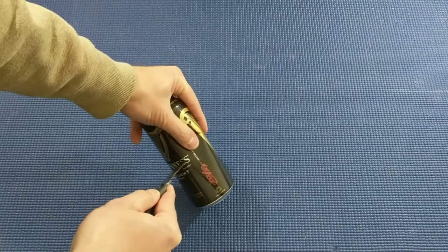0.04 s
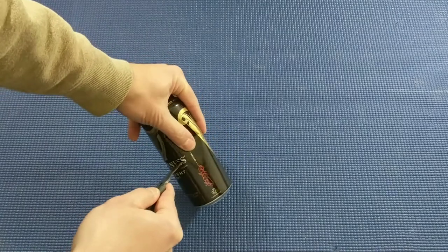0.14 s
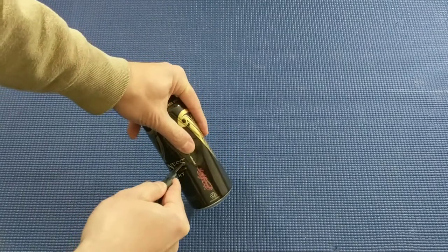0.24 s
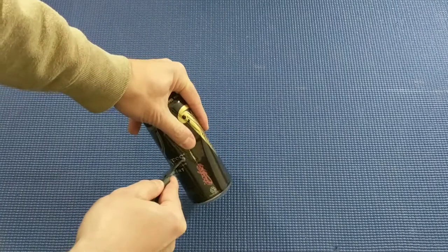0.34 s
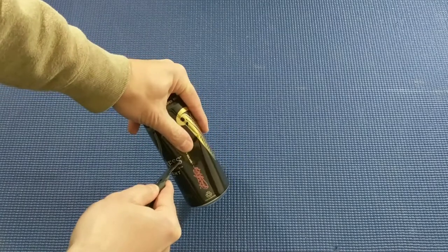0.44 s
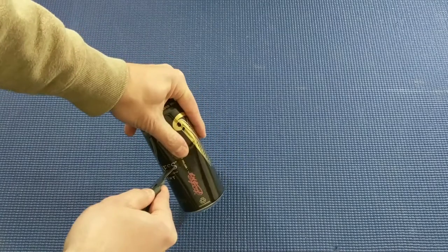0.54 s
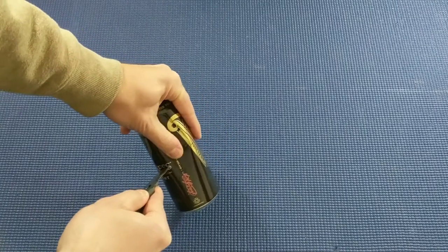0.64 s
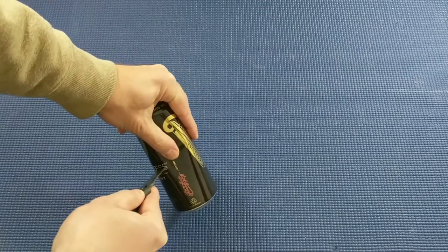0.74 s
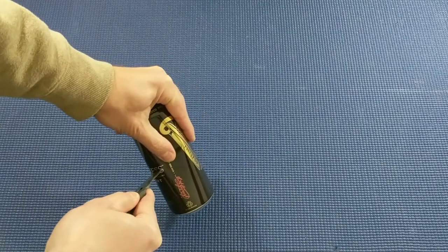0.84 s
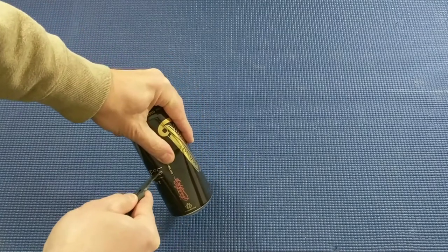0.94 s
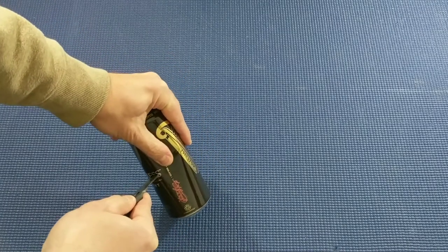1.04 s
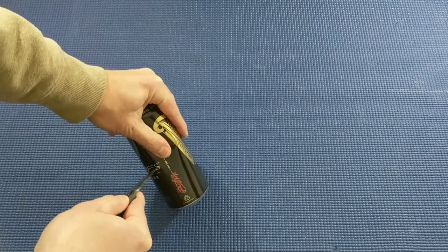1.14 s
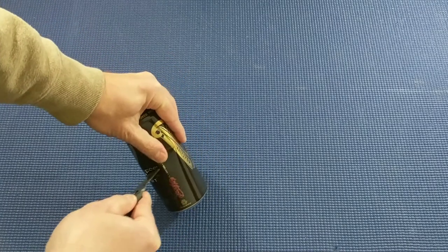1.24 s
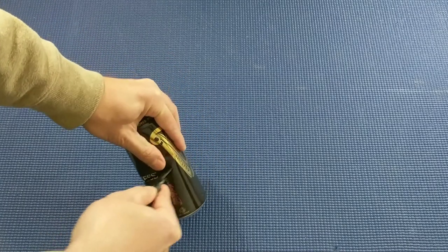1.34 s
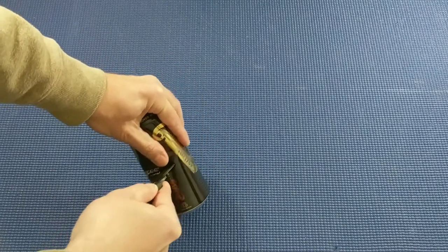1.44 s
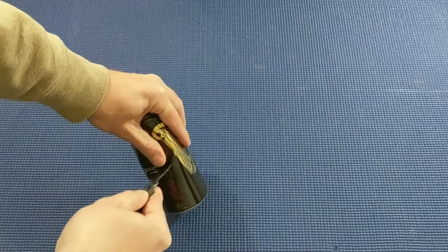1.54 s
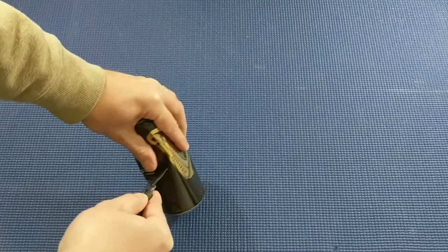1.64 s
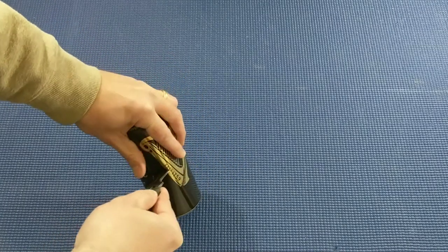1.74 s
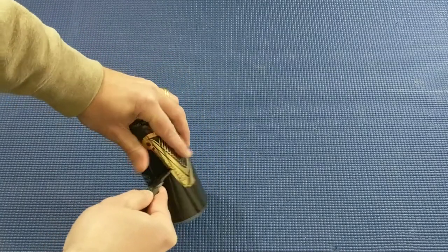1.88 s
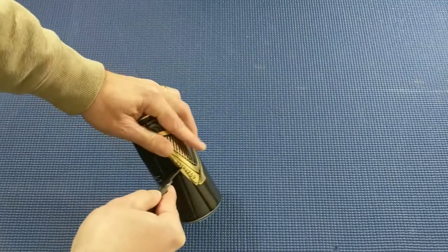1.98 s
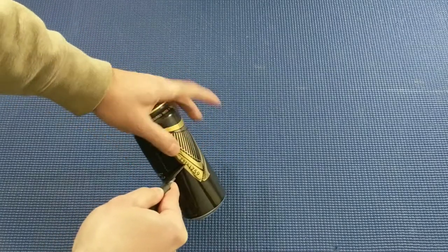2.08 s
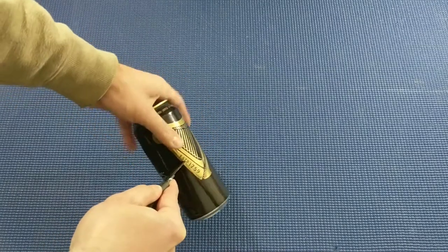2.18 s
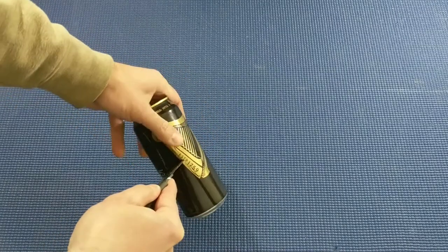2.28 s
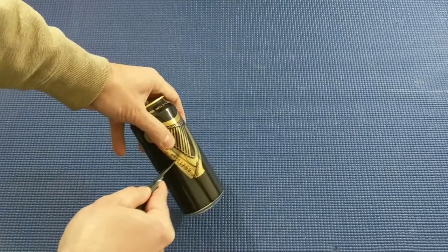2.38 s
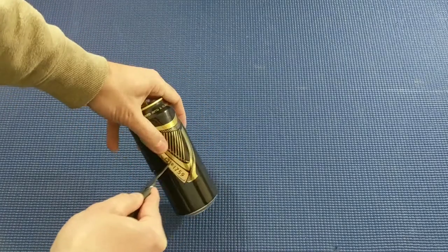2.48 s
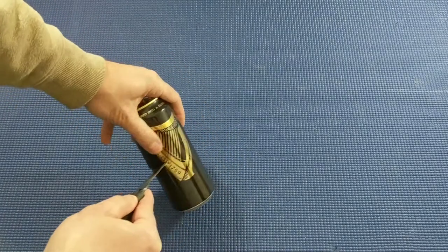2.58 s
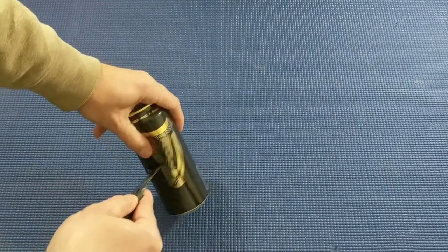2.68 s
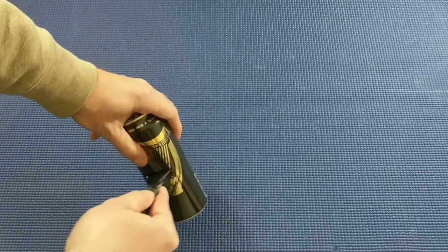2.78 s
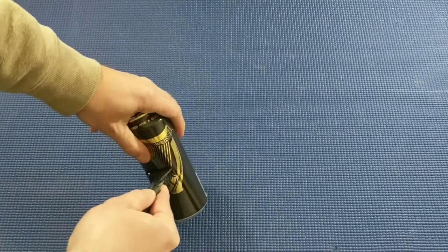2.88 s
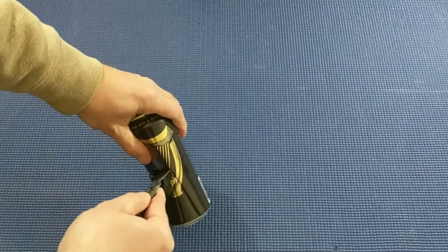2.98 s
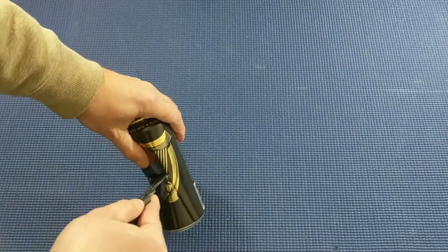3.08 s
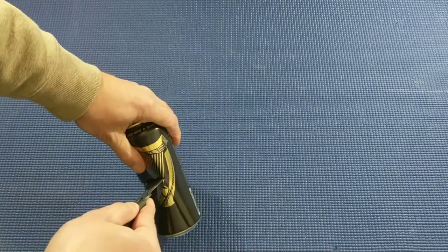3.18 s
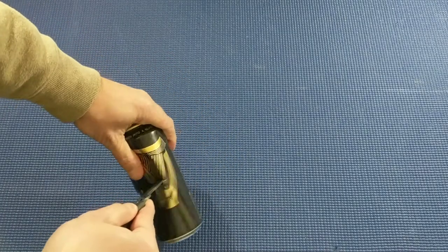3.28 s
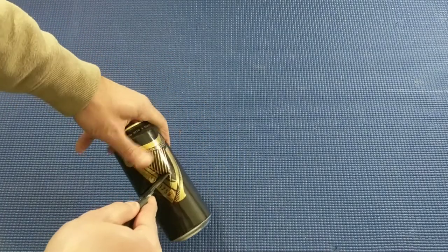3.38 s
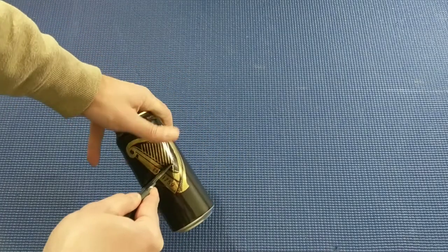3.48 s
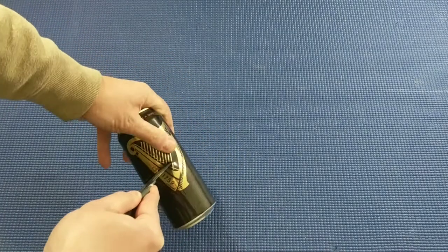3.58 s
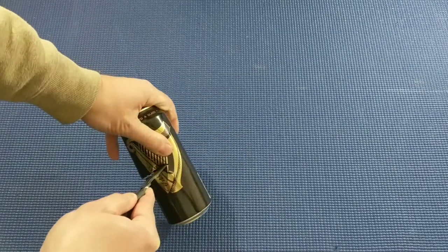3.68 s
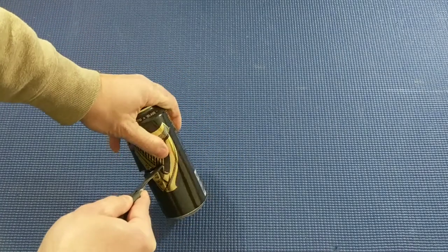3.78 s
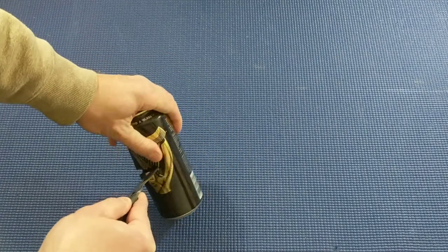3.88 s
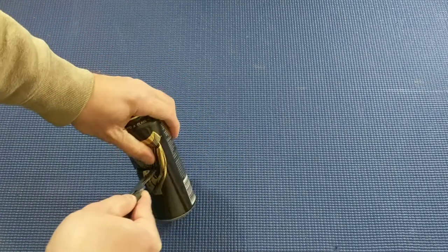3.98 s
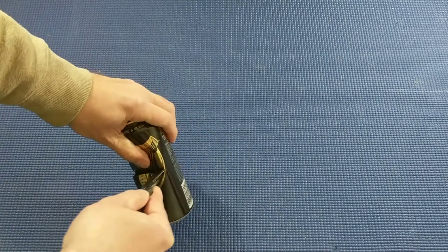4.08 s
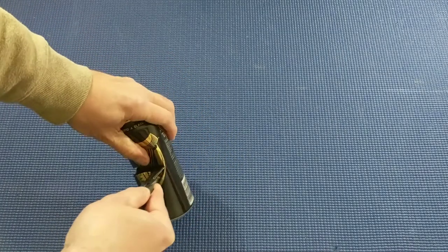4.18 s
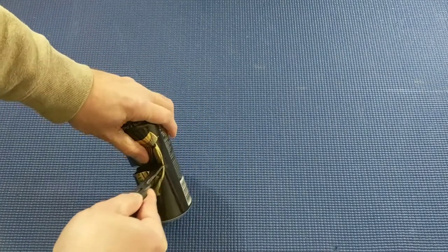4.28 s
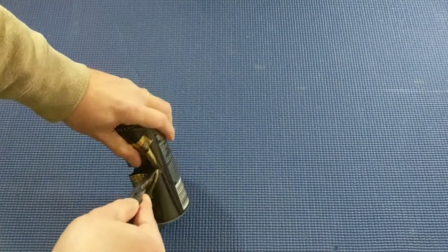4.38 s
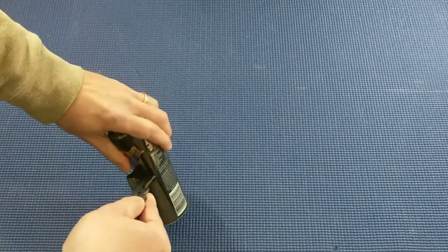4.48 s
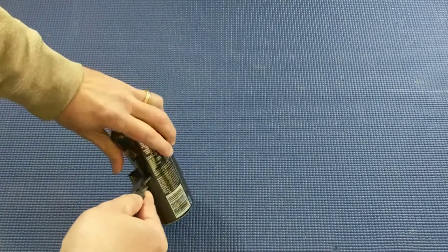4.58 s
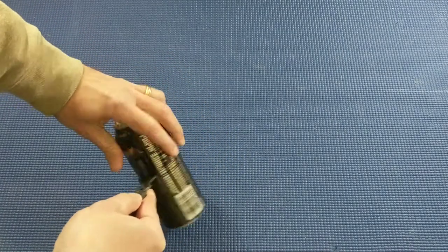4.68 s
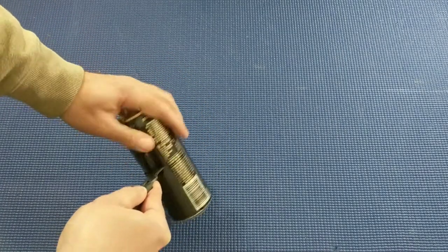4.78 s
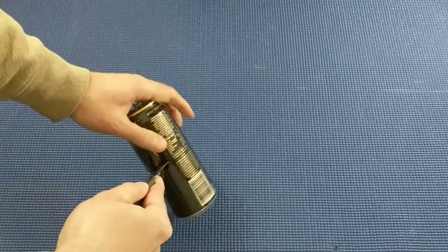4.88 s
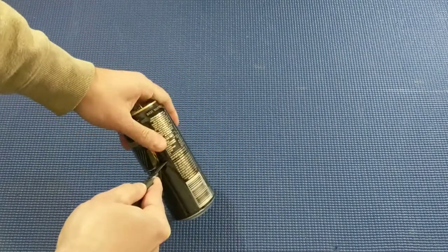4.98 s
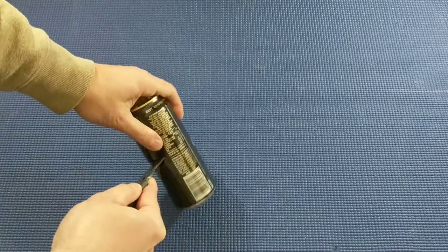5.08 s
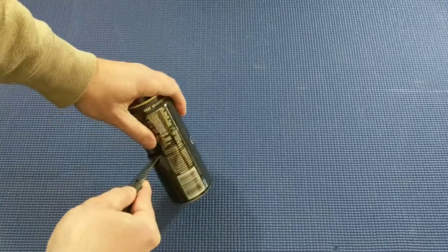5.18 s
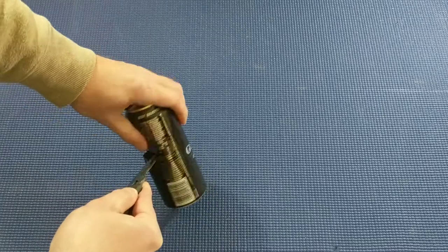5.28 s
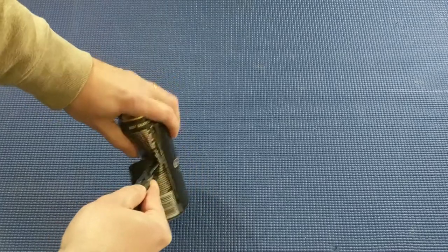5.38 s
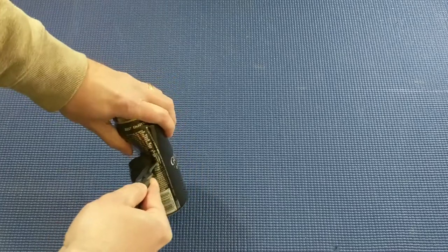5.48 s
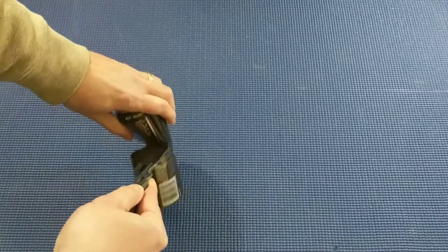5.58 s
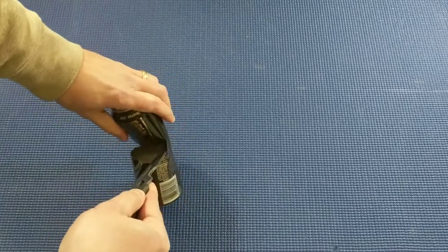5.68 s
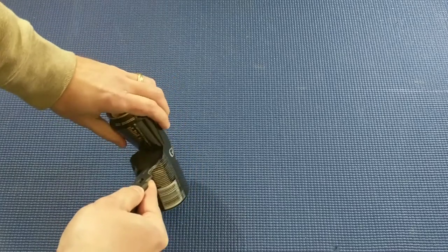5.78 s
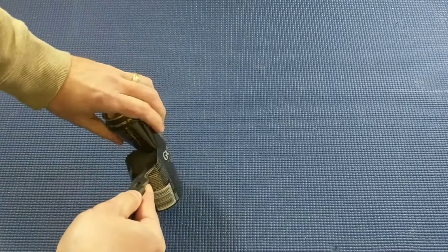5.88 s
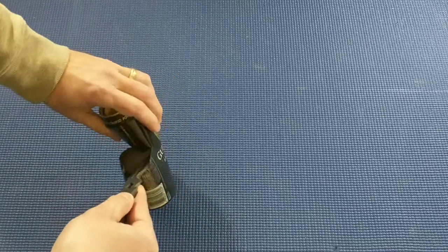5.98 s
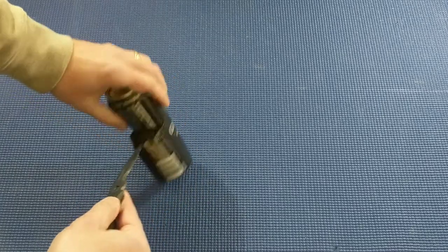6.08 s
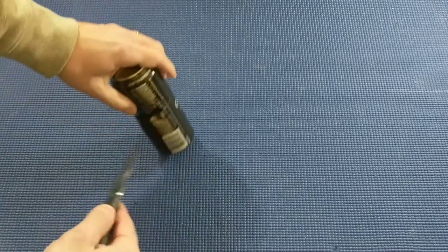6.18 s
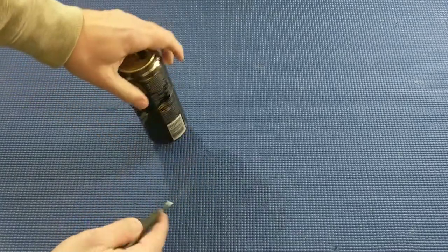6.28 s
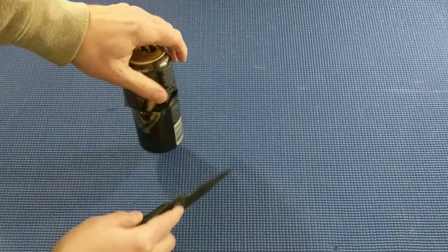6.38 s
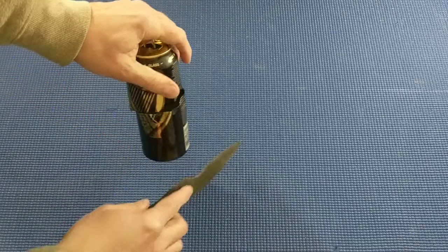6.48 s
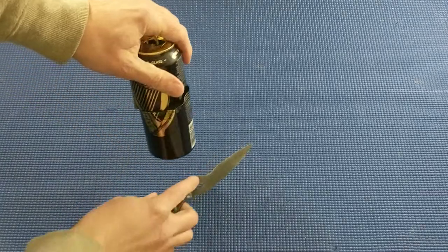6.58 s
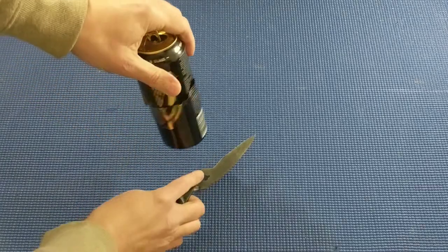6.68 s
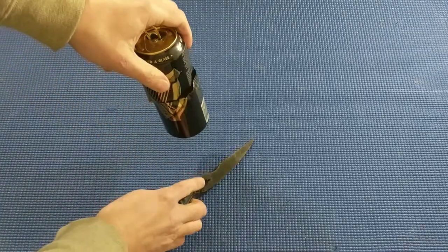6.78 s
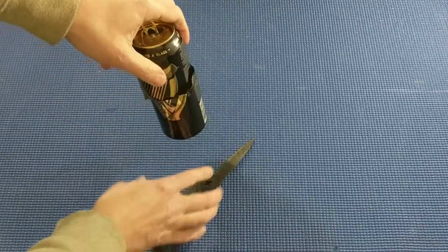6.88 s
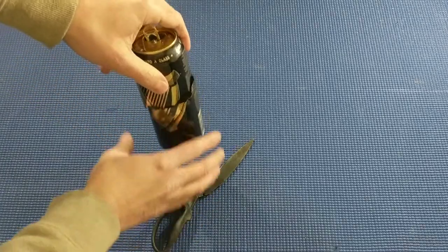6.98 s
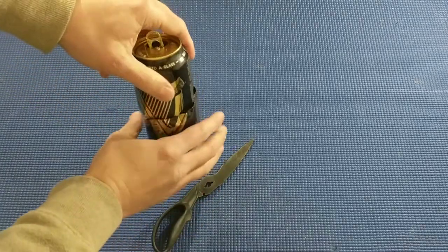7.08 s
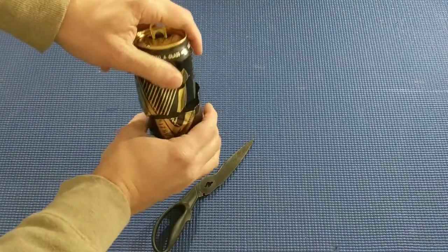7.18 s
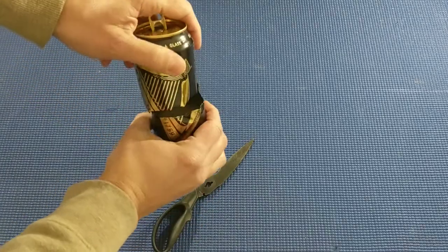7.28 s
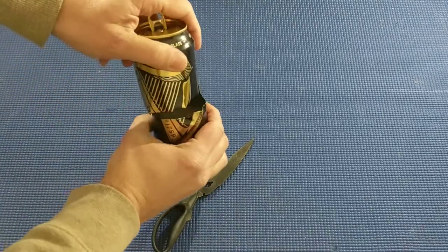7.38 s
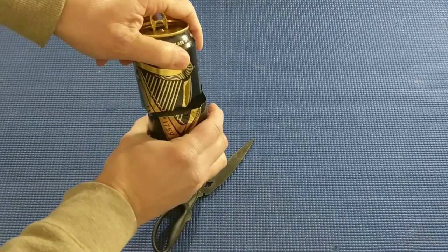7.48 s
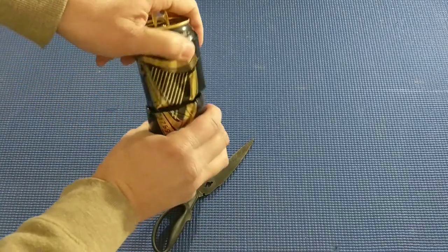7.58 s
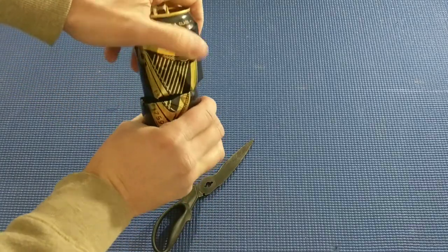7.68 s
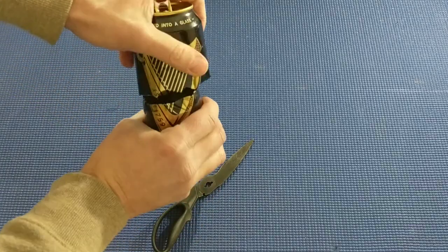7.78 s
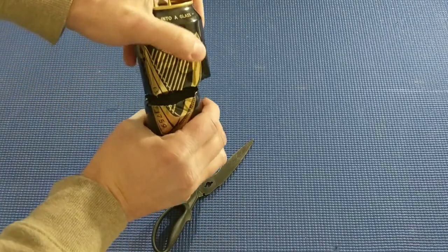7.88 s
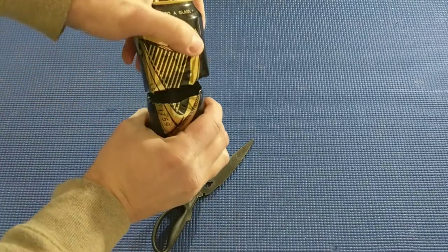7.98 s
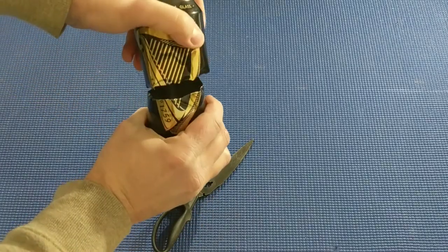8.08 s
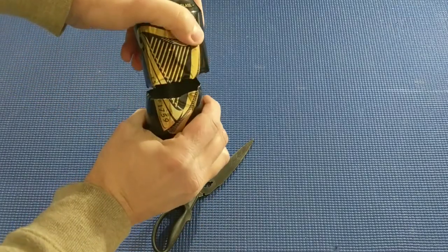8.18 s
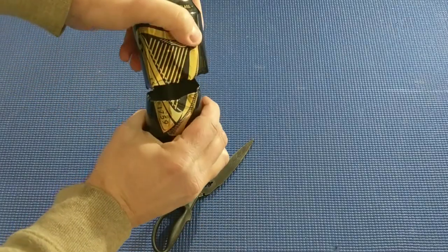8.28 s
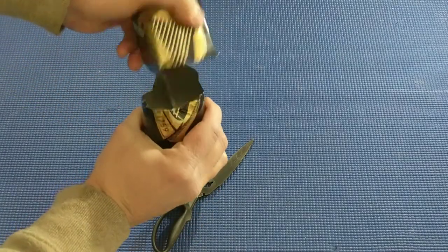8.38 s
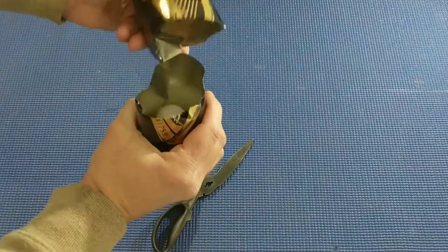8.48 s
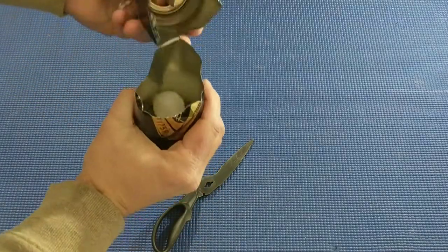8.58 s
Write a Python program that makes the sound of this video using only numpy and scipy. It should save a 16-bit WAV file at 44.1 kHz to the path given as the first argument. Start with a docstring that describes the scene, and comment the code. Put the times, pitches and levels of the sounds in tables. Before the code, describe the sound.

In a quiet room, scissors cut around a thin empty drink can on a foam mat. Short gritty rips alternate with sharp tinny pops of buckling wall, hollow at first, brighter and denser toward five or six seconds. Then a near-quiet pause with soft handling knocks, followed by isolated metallic clicks and a final hard snap and rip as the halves separate. Close microphone, very little room echo.

```python
"""A low shake of the stand in a quiet room, and at once scissors tear stepwise through a thin can on a foam mat.
Strokes are trains of fast slips, pops single blows; both ring a model of the can's wall, shell and air.
The air booms mostly higher as the slit grows. Thumps are damped low swings, twangs and whines narrow-band noise.
The last strokes and pops stand for laying the scissors down and bending the two halves apart.
"""
import sys
import numpy as np
from scipy import signal
from scipy.fft import rfft, irfft
from scipy.io import wavfile
from scipy.ndimage import uniform_filter1d

SR = 44100
rng = np.random.default_rng(int(sys.argv[2]) if len(sys.argv) > 2 else 0)


def master_out(mix):
    """Clip the mix to full scale and print it as 16-bit PCM to the path in sys.argv[1]."""
    frames = np.transpose(np.atleast_2d(mix))
    ceiling = np.clip(frames, -1, 1)
    pcm = np.round(ceiling * 32767).astype(np.int16)
    wavfile.write(sys.argv[1], SR, pcm)


def nominal_scale(level):
    """Amplitude ratio for a level in decibels (scalar or array-like)."""
    x = np.asarray(level, float) / 20
    return 10 ** x


N = 381465


def evened(x):
    """Scales to rms 1."""
    return x / np.sqrt(np.mean(x ** 2) + 1e-20)


def read(points, hz):
    """Reads a table on a log-frequency axis."""
    f, value = np.transpose(points)
    return np.interp(np.log(hz + 1), np.log(f + 1), value)


def add(mix, start_s, sound):
    """Mixes a sound in at start_s."""
    part = mix[max(round(start_s * SR), 0):][:len(sound)]
    part += sound[:len(part)]


def coloured(points, size):
    """Noise of rms 1 with the given spectrum."""
    hz = np.fft.rfftfreq(size, 1 / SR)
    spectrum = rfft(rng.standard_normal(size)) * nominal_scale(read(points, hz))
    return evened(irfft(spectrum, size))


def slow_noise(size, window):
    """Noise of rms 1, smoothed over window samples."""
    return evened(uniform_filter1d(rng.standard_normal(size), window))


def resonate(x, hz, width_hz):
    """A resonance of gain 1 that follows the curve hz: shift to 0 Hz, low-pass, shift back."""
    turn = np.exp(2j * np.pi * np.cumsum(hz * np.ones(len(x))) / SR)
    r = np.exp(-np.pi * width_hz / SR)
    return 2 * (turn * signal.lfilter([1 - r], [1, -r], x / turn)).real


# Room hush spectrum. Each row: frequency in Hz, relative density in dB per Hz.
HUSH_COLOUR = [(15, -38), (25, -4.5), (80, 2.5), (197, -4.5), (483, -7.5), (669, -12), (1320, -16.5),
               (3810, -18.5), (7300, -27.5), (9330, -26.5), (10100, -28), (15200, -25), (16500, -46)]
HUSH_RMS_DB = -65.5
# Faint lasting tones. Each row: frequency in Hz, rms in dB.
WHINE_TONES = [(9259, -87), (11644, -97)]
# Hands and mat shake the stand in swells. Each row: centre in seconds, rms at the centre in dB, sigma in seconds.
STAND_SWELLS = [(0, -45, 0.035), (1.18, -59, 0.033), (1.4, -57.5, 0.067), (1.62, -57, 0.057),
                (2.68, -56.5, 0.084), (3.17, -56.5, 0.04), (4.2, -53, 0.052), (4.559, -59, 0.18),
                (5.66, -56, 0.077), (6.919, -51.5, 0.035), (7.03, -44.5, 0.042), (7.17, -60.5, 0.081)]
# Spectrum of the shaking. Each row: frequency in Hz, relative density in dB per Hz.
STAND_COLOUR = [(12, -43.5), (20, -15.5), (41, -10), (64, 3), (127, -7), (259, -20), (300, -34),
                (390, -52.5), (660, -120)]


def background():
    """Shaped noise for hush and stand; noise through 12 Hz wide resonances for the whines."""
    t = np.arange(N) / SR
    hush = nominal_scale(HUSH_RMS_DB) * coloured(HUSH_COLOUR, N)
    whines = sum(nominal_scale(db) * evened(resonate(rng.standard_normal(N), hz, 12)) for hz, db in WHINE_TONES)
    swells = sum(nominal_scale(db) * np.exp(-.5 * ((t - s) / sigma_s) ** 2) for s, db, sigma_s in STAND_SWELLS)
    return hush + whines + swells * coloured(STAND_COLOUR, N)


# Pitch of the air in the can. Each row: time in seconds, frequency in Hz.
AIR_PITCH = [(0, 339), (1.4, 350.5), (1.55, 410), (1.8, 458), (2.6, 475), (3.8, 498.5), (4.35, 596),
             (5.58, 621.5), (5.64, 793), (6.12, 811), (6.3, 648), (7.9, 709.4), (8.4, 982)]
# Lasting shell modes, nominal. Each row: frequency in Hz, relative level in dB, t60 in seconds.
SHELL_MODES = [(382, 3, 0.17), (491.4, 3.5, .08), (653, -1, 0.23), (886.4, 6, 0.07), (1230, -3.5, .12)]
# Spectrum of the wall's countless small modes. Each row: frequency in Hz, relative density in dB per Hz.
WALL_COLOUR = [(160, -48.5), (300, -17.5), (600, -10.5), (1010, -7.5), (1480, -4), (3360, -7),
               (7000, -12.5), (15200, -16), (16800, -41)]
# Decay of the small modes, times ring. Each row: frequency in Hz, t60 in seconds.
WALL_DECAY = [(400, 0.12), (1700, 0.052), (4600, 0.045), (12000, 0.036)]
BAND_EDGES_HZ = (900, 2500, 7000)  # boom | lower wall | rip | sizzle
SHELL_DB_PER_OCTAVE = 7  # shell modes in the boom band weaken with distance from the air's pitch
LEAD_S = .003  # silence ahead of the click, room for the band filters
CAN_SAMPLES = 4096


def wall_ring(ring, click_db, crack_db):
    """A new set of small modes: noise that decays by frequency, with a direct click and a bright crack."""
    t, hz = np.arange(CAN_SAMPLES) / SR, np.fft.rfftfreq(CAN_SAMPLES, 1 / SR)
    f, frame_s, z = signal.stft(rng.standard_normal(CAN_SAMPLES), SR, nperseg=128, noverlap=96)
    decay = nominal_scale(-60 * frame_s / (ring * read(WALL_DECAY, f))[:, None])
    wall = signal.istft(z * decay, SR, nperseg=128, noverlap=96)[1][:CAN_SAMPLES]
    wall = wall * (1 + nominal_scale(crack_db) * np.exp(-t / 0.0014)) + nominal_scale(click_db) * (t == 0)
    return evened(irfft(rfft(wall) * nominal_scale(read(WALL_COLOUR, hz))))


def shell_ring(t, pitch_hz):
    """Decaying sines of the shell, each scattered in level and pitch."""
    mode_hz, db, t60_s = np.transpose(SHELL_MODES)[:, :, None]
    octaves = abs(np.log2(mode_hz / pitch_hz))
    db = db - SHELL_DB_PER_OCTAVE * octaves * (mode_hz < BAND_EDGES_HZ[0])
    scatter = rng.standard_normal((2, len(SHELL_MODES), 1))
    level = nominal_scale(db + 3 * scatter[0] - 60 * t / t60_s)
    return (level * np.sin(2 * np.pi * mode_hz * (1 + .03 * scatter[1]) * t)).sum(0)


def air_ring(t, pitch_hz):
    """Two decaying sines of the enclosed air; a wider slit makes them higher, less steady, more damped."""
    opening = pitch_hz / AIR_PITCH[0][1]
    air_hz = pitch_hz * (1 + .03 * opening * rng.standard_normal((2, 1)))
    return nominal_scale(-60 * t * opening / .14) * np.sin(2 * np.pi * air_hz * t).sum(0)


def can(s, panel_hz, panel_db, panel_t60_s, ring, click_db, crack_db, modes_db, cavity_db):
    """Answer of wall, moving panel, shell and air to one click at time s, as four bands."""
    t, hz = np.arange(CAN_SAMPLES) / SR, np.fft.rfftfreq(CAN_SAMPLES, 1 / SR)
    pitch_hz = np.interp(s, *np.transpose(AIR_PITCH))
    wall = wall_ring(ring, click_db, crack_db)
    panel = nominal_scale(panel_db) * evened(nominal_scale(-60 * t / panel_t60_s) * np.sin(2 * np.pi * panel_hz * t))
    shell = nominal_scale(modes_db) * evened(shell_ring(t, pitch_hz))
    air = nominal_scale(cavity_db) * evened(air_ring(t, pitch_hz))
    whole = rfft(wall + panel + shell + air) * np.exp(-2j * np.pi * hz * LEAD_S)
    whole = whole * (hz / 270) ** 6 / (1 + (hz / 270) ** 6)  # a small can has no bass
    below = [0] + [1 / (1 + (hz / edge) ** 6) for edge in BAND_EDGES_HZ] + [1]
    bands = np.array([irfft(whole * (below[k + 1] - below[k])) for k in range(4)])
    fade_out = np.clip((t[-500] - t) / .035, 0, 1)
    return bands * signal.windows.tukey(CAN_SAMPLES, LEAD_S * SR / CAN_SAMPLES) * fade_out


# Strokes of the blades. Each row: start in seconds, let-go in seconds, rip at the start without the bite in dB,
# rip at let-go in dB, boom over rip in dB, sizzle over rip in dB.
BLADE_STROKES = [(0.006, 0.03, -43, -54, 0, -1.5), (0.209, 0.27, -53.5, -46, 13, -11.5),
                 (0.27, 0.33, -27, -31.5, -11.5, -17), (0.408, 0.431, -53.5, -24, -11, -17.5),
                 (0.609, 0.637, -74, -55.5, 4, -12), (0.685, 0.706, -56, -48.5, 9, -11),
                 (1.148, 1.199, -30.5, -32.5, 8, -10.5), (1.288, 1.407, -49, -33.5, 8.5, -8),
                 (1.526, 1.6, -32.5, -27.5, 8, -15), (1.748, 1.836, -34.5, -42, 15, -8.5),
                 (1.932, 1.977, -62.5, -53, 11.5, -10), (2.001, 2.028, -47, -46, 3, -5.5),
                 (2.239, 2.299, -62.5, -52, 9, -14), (2.54, 2.636, -49, -33, 3, -8),
                 (2.728, 2.762, -47, -52, 9.5, -12), (2.781, 2.832, -42, -31, 12.5, -9.5),
                 (2.957, 3.089, -49.5, -80, 14.5, -13), (3.122, 3.151, -38.5, -36.5, 10.5, -13.5),
                 (3.265, 3.373, -65, -64.5, 17, -9), (3.703, 3.79, -41.5, -43.5, 5, -19),
                 (3.801, 3.872, -27.5, -37, -3, -26.5), (4.028, 4.046, -27, -42, 0, -8),
                 (4.091, 4.164, -45, -32.5, 5.5, -11), (4.257, 4.31, -68, -61, 2, -7),
                 (4.331, 4.394, -29, -31.5, -3.5, -17), (4.504, 4.649, -32, -42, -1.5, -9),
                 (4.67, 4.704, -70, -45, 3, -24), (4.87, 4.9, -65, -32, -5, -8),
                 (4.958, 5.019, -66.5, -59.5, 5.5, -4), (5.057, 5.071, -39, -45.5, -3, -8.5),
                 (5.131, 5.216, -16, -16, -24, -16.5), (5.331, 5.376, -51.5, -40, 6.5, -11),
                 (5.402, 5.47, -42, -33.5, -1.5, -7.5), (5.496, 5.574, -38.5, -54, 2.5, -14),
                 (5.6, 5.659, -30.5, -29.5, 0, -7), (5.679, 5.761, -41, -46, -7, -4.5),
                 (5.769, 5.845, -46, -30.5, 1, -12), (5.849, 5.906, -34.5, -41, 2, -8),
                 (5.973, 6.003, -62, -38.5, 0.5, -10.5), (6.074, 6.107, -55, -39, -5, 4.5),
                 (6.112, 6.139, -31.5, -32.5, 0, -1), (6.153, 6.181, -22.5, -29, -7, -9),
                 (6.551, 6.822, -79, -75.5, -3.5, -13), (6.859, 6.884, -57, -69, 4.5, -20),
                 (6.908, 6.929, -59, -58.5, -24, -8), (7.164, 7.216, -58, -62, -1, -7),
                 (7.705, 7.828, -74, -60, 7.5, -3), (7.829, 7.86, -26.5, -48.5, 5.5, -9),
                 (8.447, 8.522, -23, -39.5, -16.5, -11)]
BITE_S, BITE_DB = 0.0089, 16  # as the blades bite, the level climbs this much in this time
LET_GO_DB_PER_S, LET_GO_S = 552.5, .065  # the blades ease off
BOOM_LAG, LOW_LAG = 0.19, 0.22  # boom and lower wall lose this share of a dB less than the rip
LOW_DB, LOW_PER_BOOM = -11, 0.14  # lower wall over a 0 dB rip; hollow strokes shake it too
SLIPS_PER_S = 750  # typical, the speed wanders
STRIP_HZ, STRIP_SPREAD, STRIP_T60_S = 3190, 0.059, .004  # strip between the blades
STRIP_DB, STRIP_PER_SIZZLE = -15, 0.44  # rings more in dull, hard rasping strokes with little sizzle
DENT_S = .03  # time between new can answers


def slip_force(size):
    """Stick-slip of metal under blades: an uneven train of clicks over a fine rasp, rms 1 before the end tapers."""
    speed = SLIPS_PER_S * nominal_scale(2.5 * slow_noise(size, 150))
    ticks = np.diff(np.floor(np.cumsum(speed) / SR), prepend=0)
    slips = ticks * nominal_scale(np.minimum(rng.exponential(2.4, size), 8))  # a few slips tick out
    clumps = nominal_scale(1.2 * slow_noise(size, 300))
    rasp = .35 * rng.standard_normal(size)
    return evened((evened(slips) + rasp) * clumps) * signal.windows.tukey(size, .04)


def stroke(start, let_go, first_db, last_db, boom_db, sizzle_db):
    """Slip force drives the bending can, whose four bands follow their own levels."""
    t = np.arange(start, let_go + LET_GO_S, 1 / SR)
    rip_db = np.interp(t, (start, let_go), (first_db, last_db))
    rip_db = rip_db - BITE_DB * np.maximum(1 - (t - start) / BITE_S, 0)
    rip_db = rip_db - LET_GO_DB_PER_S * np.maximum(t - let_go, 0)
    boom_db = boom_db + BOOM_LAG * (rip_db.max() - rip_db)
    low_db = LOW_DB - LOW_LAG * rip_db + LOW_PER_BOOM * boom_db
    strip_hz = STRIP_HZ * (1 + STRIP_SPREAD * rng.standard_normal())
    strip_db = STRIP_DB - STRIP_PER_SIZZLE * sizzle_db
    drives = slip_force(len(t)) * nominal_scale([rip_db + db for db in (boom_db, low_db, 0, sizzle_db)])
    click_db = 35 + .3 * rip_db  # harder cuts give more distinct clicks
    sound, step = np.zeros(len(t) + CAN_SAMPLES), round(DENT_S * SR)
    for at in range(0, len(t), step):
        bands = can(t[at], strip_hz, strip_db, STRIP_T60_S, ring=0.94, click_db=click_db[at],
                    crack_db=8.5, modes_db=-8, cavity_db=-1.5)
        bands = bands / np.linalg.norm(bands, axis=1, keepdims=True)
        add(sound, at / SR, signal.fftconvolve(drives[:, at:at + step], bands, axes=1).sum(0))
    return start - LEAD_S, sound


# The wall buckles. Each row: time in seconds, rip-band peak in dB, boom over that peak in dB,
# sizzle over that peak in dB, panel frequency in Hz.
WALL_POPS = [(0.011, -31.5, 5, -12, 2510), (0.2774, -20.5, -10.5, -18, 1320), (0.4324, -4, -23, -10, 3200),
             (0.6876, -41, -23, -19, 1750), (1.1508, -20.5, 0, -10, 2030), (1.3586, -28.5, 0.5, 0, 2120),
             (1.4119, -9.5, -13.5, -8.5, 2090), (1.7549, -41, 18, -19.5, 1690),
             (1.9619, -42.5, 13, -12, 1270), (1.9857, -4.5, -11.5, -7.5, 4510),
             (2.0191, -17, -17.5, -14, 2900), (2.1074, -20, -14, -43, 1420), (2.1241, -4.5, -21, -5, 1460),
             (2.3077, -10, -18, -9.5, 1223), (2.3845, -32.5, -5, -15, 1230), (2.4083, -3, -12, -4, 2560),
             (2.5591, -35.5, 3, -18, 2200), (2.7686, -9.5, -9.5, -15, 1770),
             (2.805, -7.5, -33.5, -17, 4850), (2.916, -40.5, -0.5, 0, 3000), (2.9533, -26, -8, -27, 1380),
             (3.0056, -16.5, -2, -28, 2860), (3.0817, -51, 12.5, -22, 1470), (3.1444, -20, -5, -34, 1630),
             (3.3798, -12.5, -7, -24, 1730), (3.4358, -8, -17.5, -4, 1530), (3.4534, -6, -15.5, -11, 2505),
             (3.5844, -3.5, -17.5, -0.5, 3770), (3.6392, -38, 5, -4, 3640), (3.675, -31, -12, -43, 3280),
             (3.704, -29, -11, -40, 1790), (3.929, -20.5, -6.5, -11, 2030), (4.0122, -9.5, -17.5, 1, 4040),
             (4.0702, -26, -4, -15, 3330), (4.0772, -13, -6.5, -7, 1537), (4.1133, -20, -21, -2, 4060),
             (4.1921, -21, -20, -12, 2270), (4.2354, -28.5, -2, -15, 1710), (4.2866, -41, 15.5, -14, 1750),
             (4.3204, -8.5, -12.5, -17, 2960), (4.4702, -33, -2, -7, 3540), (4.49, -20, 5.5, -12, 2310),
             (4.6569, -21, 3, -23, 832), (4.696, -13, -15, -22, 2530), (4.761, -6.5, -13.5, 4, 1724),
             (4.8886, -20.5, -46, 0, 2490), (5.0801, -23, -11, -29, 1660), (5.0815, -5.5, -44, -17, 1720),
             (5.1151, -5.5, -25, -10.5, 2510), (5.3169, -31, -10, 13, 1444), (5.3667, -26, -15, -3, 1190),
             (5.3966, -17.5, -16, -11, 1230), (5.4317, -22, -6, -5, 2970), (5.614, -20, -15, -2, 1437),
             (5.9406, -25.5, -14, -7, 1155), (6.117, -17.5, -26.5, -21, 1110),
             (6.1656, -15.5, -44.5, -6, 1830), (6.2744, -35.5, 6.5, -8.5, 1444),
             (6.6294, -56.5, -3.5, -18, 1012), (6.8648, -50, -11, -20, 2630),
             (6.875, -43.5, 9.5, -27, 1010), (6.99, -50.5, -16, -20.5, 2180),
             (7.0788, -53.5, -12.5, -18, 1343), (7.208, -26.5, -38.5, -7.5, 2990),
             (7.5561, -18, -11, -18.5, 2270), (7.6438, -54.5, -2.5, 5, 1420),
             (7.6943, -57, 20.5, -14, 1270), (7.713, -45.5, -14, 0, 1280), (7.7524, -36.5, 2, -8, 1310),
             (7.7964, -47, 8, 8, 1300), (7.8333, -29, -9.5, 13.5, 3170), (7.8516, -15, -19, -12, 1860),
             (7.9574, -15, -13, -25, 1784), (8.0657, -49, -27.5, -29.5, 1223), (8.107, -52, -14, -31, 1230),
             (8.1969, -10, -37, -4.5, 1230), (8.4065, -6.5, -25.5, -7.5, 1230),
             (8.526, -9.5, -15.5, -1, 1102)]
PANEL_CYCLES = 110  # a popped panel falls 60 dB in this many cycles
# lower wall over the peak: dB for a 2 kHz panel, dB per octave of panel, share of boom dB, share of peak dB
POP_LOW_DB, POP_LOW_DB_PER_OCTAVE, POP_LOW_PER_BOOM, POP_LOW_PER_PEAK = -4, -5.5, .2, -.12


def pop(s, peak_db, boom_db, sizzle_db, panel_hz):
    """A dent snaps through: one blow into the can; large and hollow dents shake the lower wall most."""
    bands = can(s, panel_hz, panel_db=-8, panel_t60_s=PANEL_CYCLES / panel_hz, ring=1.73, click_db=2.5,
                crack_db=5.5, modes_db=-7.5, cavity_db=-6.0)
    low_db = POP_LOW_DB + POP_LOW_DB_PER_OCTAVE * np.log2(panel_hz / 2000)
    low_db = low_db + POP_LOW_PER_BOOM * boom_db + POP_LOW_PER_PEAK * peak_db
    gains = nominal_scale(peak_db + np.array([boom_db, low_db, 0, sizzle_db])) / abs(bands).max(1)
    return s - LEAD_S, gains @ bands


ECHO_DB, ECHO_T60_S, ECHO_GAP_S = -23.5, 0.2, .006


def echo(x):
    """The room returns a weak, dull tail: convolution with decaying low-passed noise."""
    t = np.arange(SR // 2) / SR
    tail = signal.lfilter([1], [1, -.6], rng.standard_normal(len(t)))
    tail = tail * nominal_scale(-60 * t / ECHO_T60_S) * (t > ECHO_GAP_S)
    return nominal_scale(ECHO_DB) * signal.fftconvolve(x, tail / np.linalg.norm(tail))[:N]


# Some blows also thump the stand low. Each row: time in seconds, peak in dB.
STAND_THUMPS = [(2.407, -34), (3.585, -51.5), (4.759, -29), (6.874, -38), (8.404, -53.5), (8.524, -37.5)]


def thump(s, peak_db):
    """Two heavily damped low swings, 75 and 160 Hz."""
    t = np.arange(4000) / SR
    swing = np.sin(2 * np.pi * 75 * t) * np.exp(-t / 0.032)
    swing = swing + 1.6 * np.sin(2 * np.pi * 160 * t) * np.exp(-t / 0.0083)
    return s, nominal_scale(peak_db) * swing / abs(swing).max()


# The freed strip of metal sings faintly. Each row: start in seconds, end in seconds, start frequency in Hz,
# end frequency in Hz, rms before the fades in dB.
STRIP_TWANGS = [(5.685, 5.781, 1110, 1133, -40), (5.86, 6.001, 1144, 1129, -43),
                (8.09, 8.154, 368, 386, -64.5), (8.26, 8.399, 790, 823, -70),
                (8.45, 8.507, 1202, 1260, -31.5), (8.535, 8.68, 1063, 1225, -56.5)]


def twang(start, end, start_hz, end_hz, db):
    """A thin, slightly unsteady tone: noise through a narrow gliding resonance."""
    size = round((end - start) * SR)
    glide_hz = np.linspace(start_hz, end_hz, size)
    tone = resonate(rng.standard_normal(size), glide_hz, width_hz=10.55)
    return start, nominal_scale(db) * evened(tone) * signal.windows.tukey(size, .4)


def scene():
    """All strokes, pops, thumps and twangs, their echo and the background."""
    metal = np.zeros(N)
    for play, rows in ((stroke, BLADE_STROKES), (pop, WALL_POPS), (thump, STAND_THUMPS), (twang, STRIP_TWANGS)):
        for row in rows:
            add(metal, *play(*row))
    return (metal + echo(metal) + background())[None]


def roll_off(x):
    """The treble ends steeply here."""
    return signal.sosfilt(signal.butter(12, 17000, fs=SR, output="sos"), x)


def record(dry):
    """Full-scale clipping, then a linear-phase low-pass at 16.4 kHz."""
    lowpass = signal.firwin(511, 16400, window=("kaiser", 10), fs=SR)
    limited = signal.oaconvolve(np.clip(dry, -1, 1), lowpass[None], "same")
    return roll_off(limited)


dry = scene()
out = record(dry)
master_out(out)
```